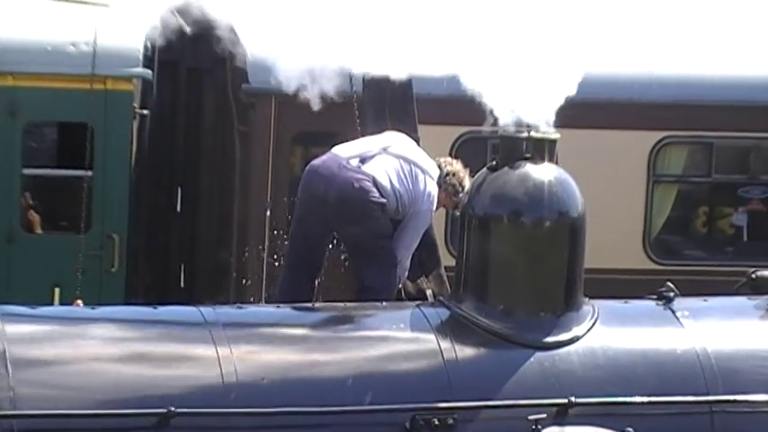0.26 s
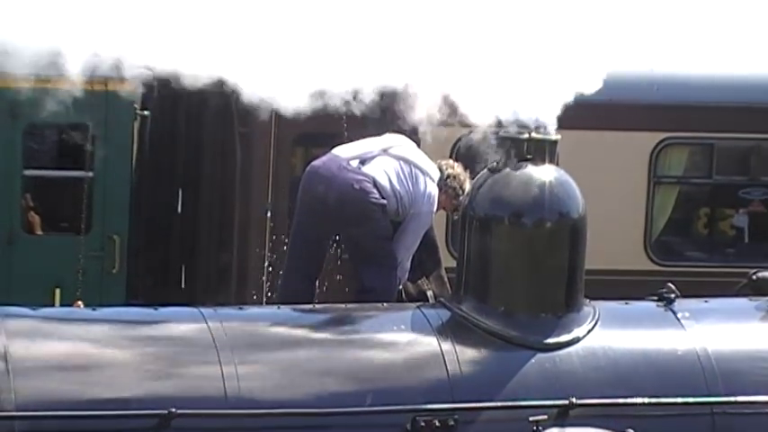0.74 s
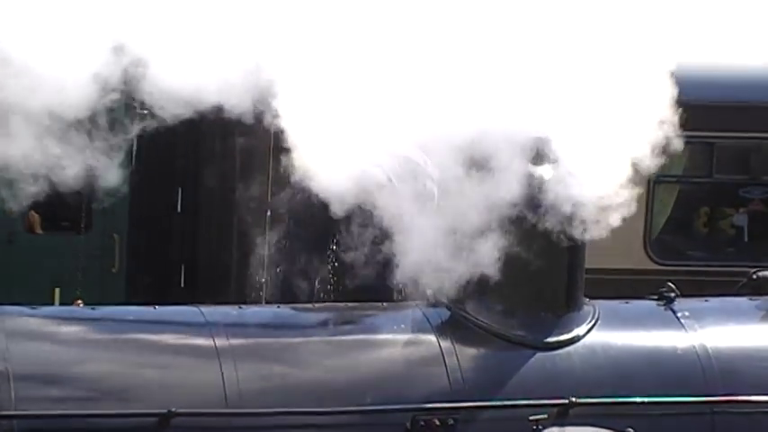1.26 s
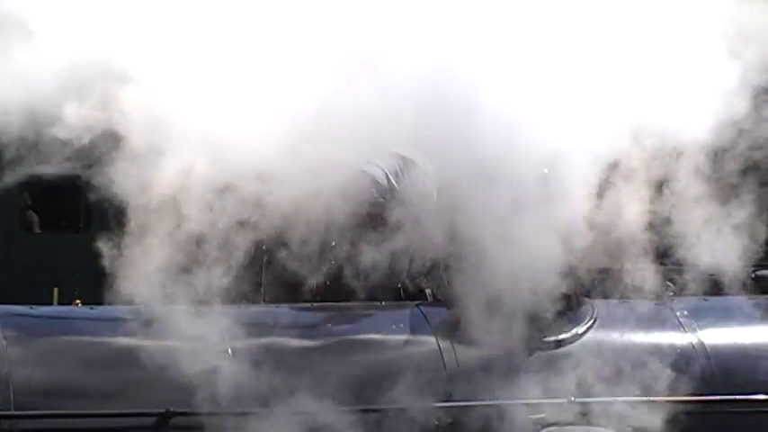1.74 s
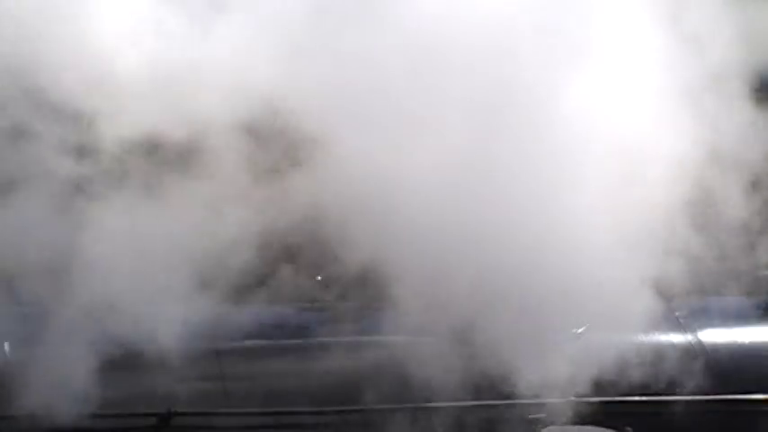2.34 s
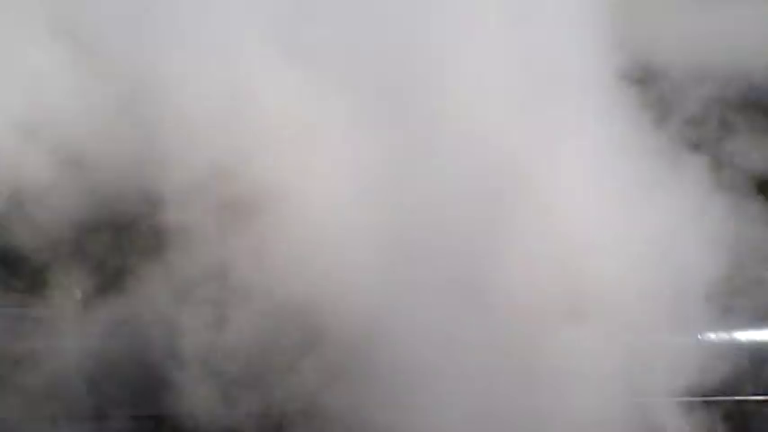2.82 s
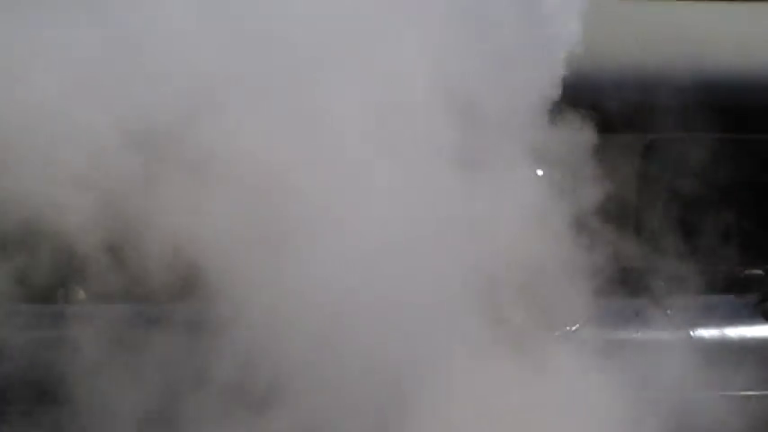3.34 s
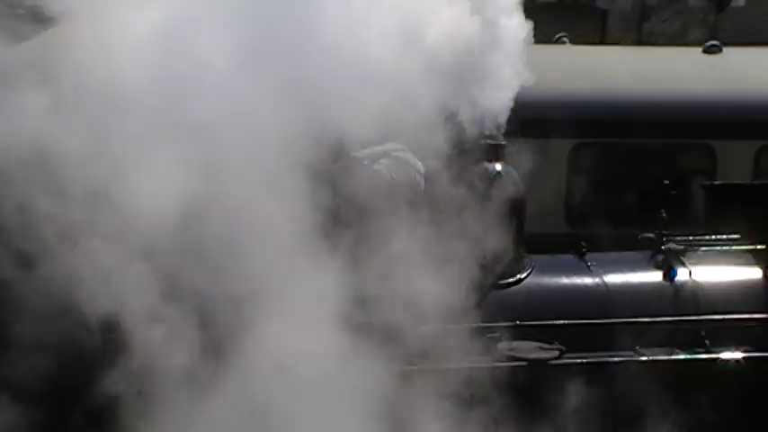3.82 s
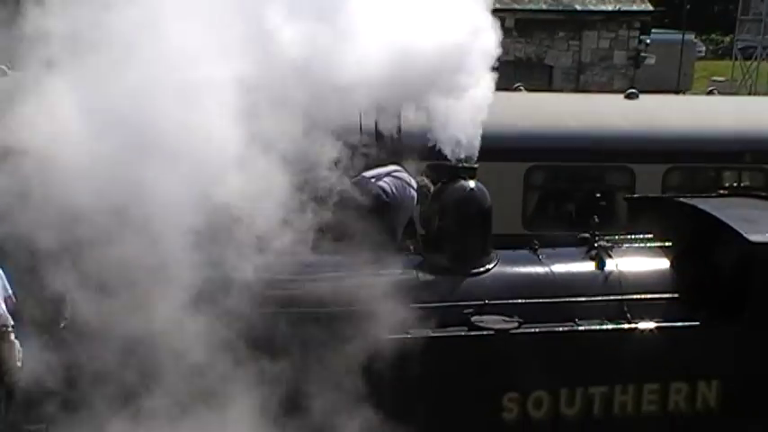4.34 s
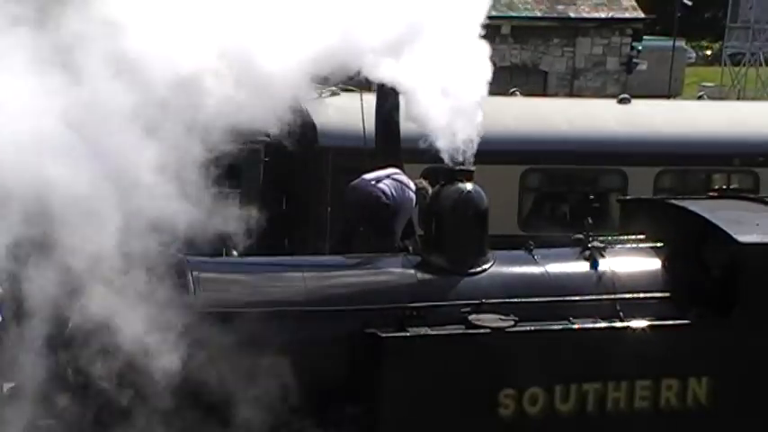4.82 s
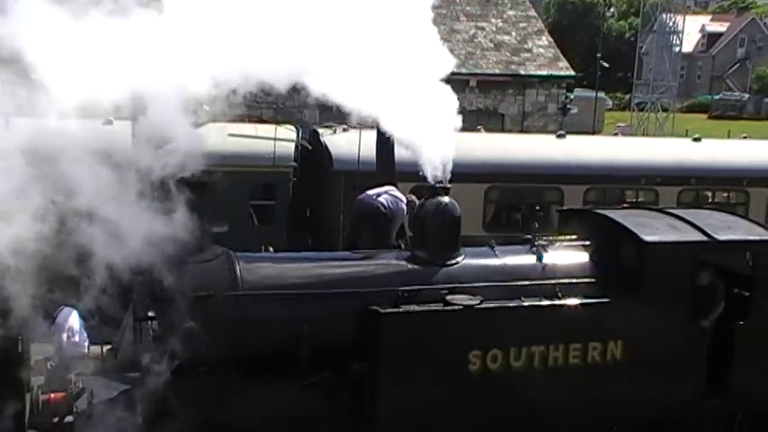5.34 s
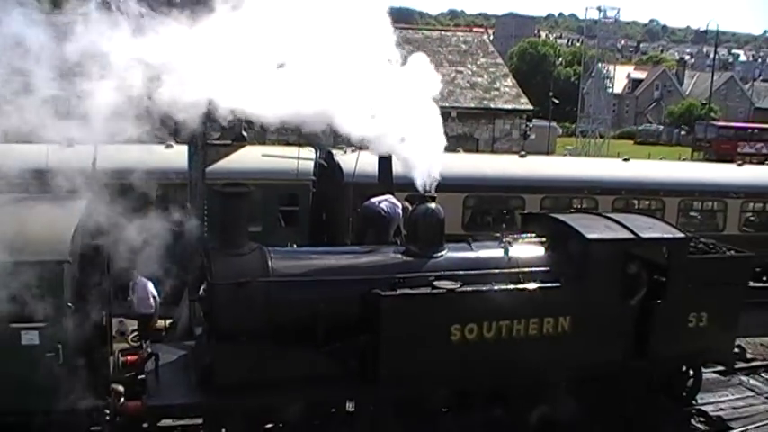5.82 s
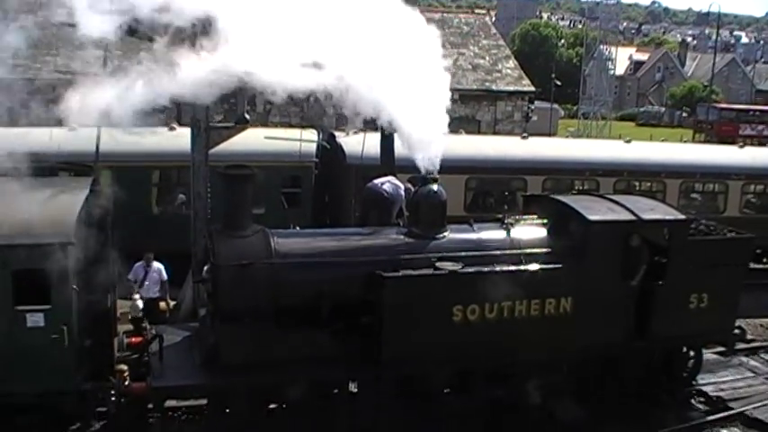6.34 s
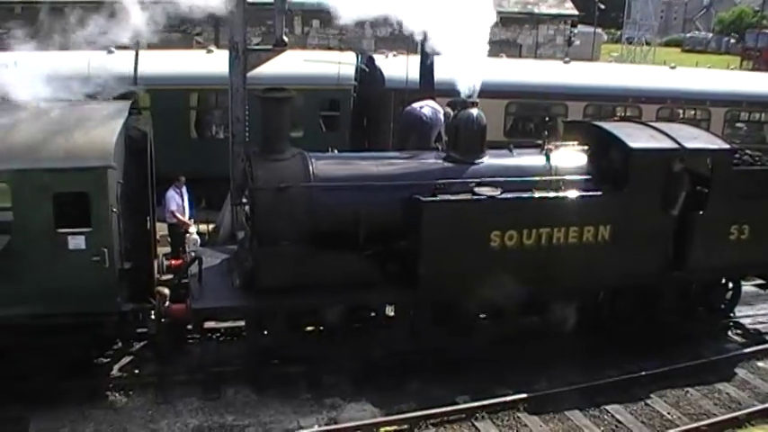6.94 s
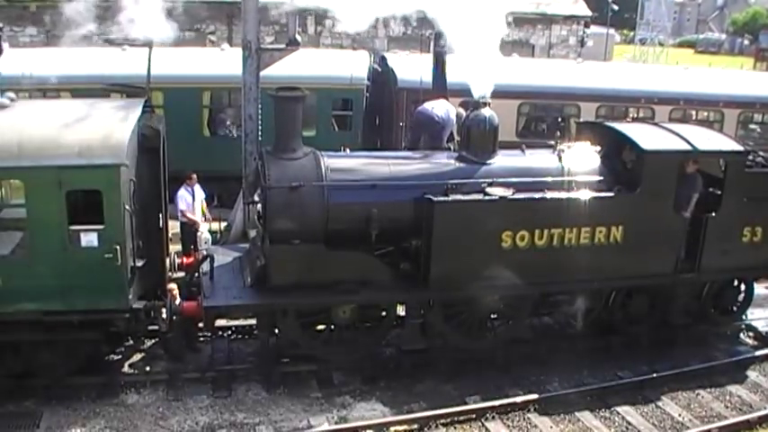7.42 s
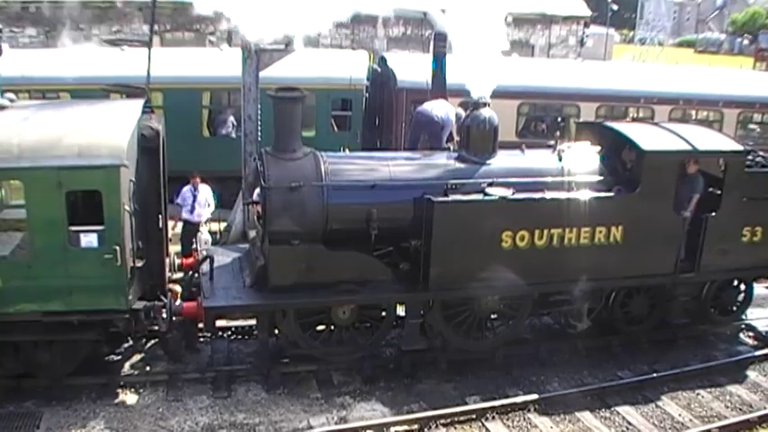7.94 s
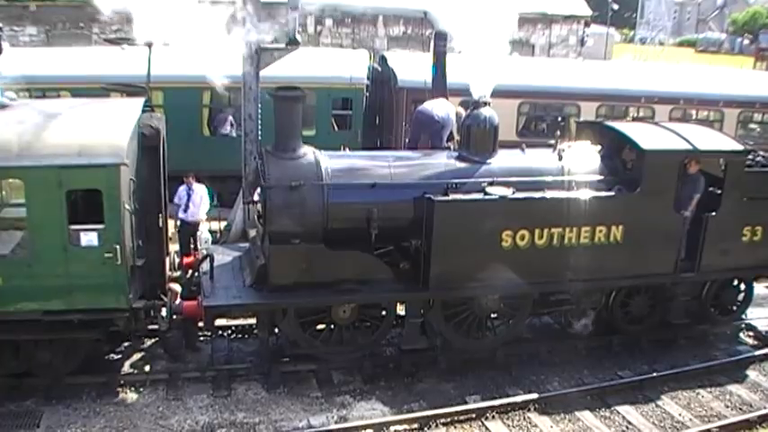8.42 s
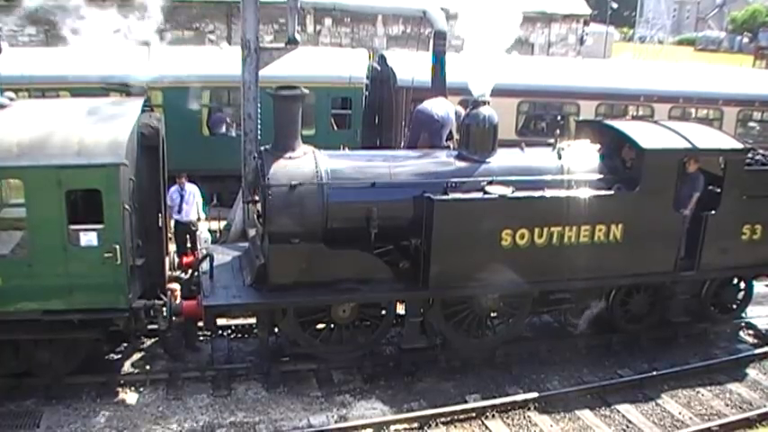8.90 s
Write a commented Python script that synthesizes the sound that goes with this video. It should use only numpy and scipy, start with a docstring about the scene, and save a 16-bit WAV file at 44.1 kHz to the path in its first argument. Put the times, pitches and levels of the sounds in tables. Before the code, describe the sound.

Full, constant steam noise fills the whole stretch, wide-band and rough, with a slightly hollow, resonant body and bright sizzling top. Near three seconds the highest hiss dulls a little, then clears. Low wind ruffles the two microphone channels early and more strongly near eight seconds. A barely audible low hum lies underneath. Open-air platform, little echo, no separate events.

```python
"""One unbroken jet of steam roars and hisses from the safety valves of a standing locomotive.
Shaped noise is the jet: resonances and close reflections colour it, a leaning, billowing plume sways it.
Carriages and platform add a faint scattered echo; gusts of low noise ruffle two microphone ports.
A low, slightly unsteady sine hums underneath."""
import sys
import numpy as np
from scipy import signal
from scipy.fft import rfft, irfft
from scipy.io import wavfile
from scipy.ndimage import uniform_filter1d

SR = 44100
rng = np.random.default_rng(int(sys.argv[2]) if len(sys.argv) > 2 else 0)


def bounce(signal):
    """Save signal as a 16-bit WAV file at the path given by the first command-line argument."""
    frames = np.transpose(np.atleast_2d(signal))
    limited = np.clip(frames, -1, 1)
    pcm = np.round(limited * 32767).astype(np.int16)
    wavfile.write(sys.argv[1], SR, pcm)


N = 404397
T_S = np.arange(N) / SR
FRAME_SIZE, HOP = 2048, 256  # samples
BIN_HZ = np.fft.rfftfreq(FRAME_SIZE, 1 / SR)
FRAME_S = np.arange(N // HOP + 2) * HOP / SR
BAND_EDGE_HZ = 15830


# jet spectrum, roar near 1 kHz and hiss near 7 kHz: f/Hz, relative density/dB
JET_SPECTRUM = [(40, -47), (130, -37), (220, -28), (310, -16.5), (440, -15), (720, -7.5), (1300, -0.5),
                (1900, -3.5), (3100, -3), (3900, -6.5), (5000, -7), (6300, -3), (7800, -1.5), (10800, -7.5),
                (11900, -14), (15600, -27)]
# likeness of the two ports: f/Hz, correlation
PORT_LIKENESS = [(100, .85), (300, 0.9), (600, 0.98), (3000, 0.98), (4300, .998), (5600, 0.94), (7500, 0.9),
                 (9000, 0.83), (10200, 0.48), (12500, 0.79), (15000, 0.85)]
# left minus right: f/Hz, level difference/dB
PORT_BALANCE = [(60, 12), (200, 5), (700, 4), (1200, 2), (2600, 1.8), (3600, 0), (5400, 0), (6800, 1.6),
                (8800, 1.3), (10100, 8), (11500, 3.5), (13300, 3.5), (14900, 3), (15600, 2)]
# phase by which left leads: f/Hz, phase/rad
PORT_LEAD = [(100, 0), (340, 0.39), (700, -0.32), (1300, 0.036), (4700, 0), (6600, -0.052), (7800, -0.13),
             (9400, 0.76), (9900, .8), (10900, -.4), (11800, .15), (15400, -.1)]


def safety_valves(jet_db=-15.5, flutter_db=1.08, patches_db=1.03):
    """Turbulent steam excites the resonances; eddies scatter short waves the most."""
    colour_db = over_hz(JET_SPECTRUM) + path_colour()
    flutter = flutter_db * eddies(seconds=.03, span_hz=5200)
    patches = patches_db * eddies(seconds=.092, span_hz=600)
    scatter = BIN_HZ / (BIN_HZ + 1000)
    jet_gain = gain_of(colour_db + plume_sway() + scatter * (flutter + patches))
    # each port takes half the level and phase difference, in opposite senses
    left = gain_of(over_hz(PORT_BALANCE) / 2) * np.exp(.5j * over_hz(PORT_LEAD))
    ports = np.array([left, 1 / left])[:, None]
    jet = sound_of(port_pair(over_hz(PORT_LIKENESS)) * jet_gain * ports)
    steam = casing(jet)
    return gain_of(jet_db) * steam / np.std(steam.mean(0))


# resonances and dips of casing, dome and surroundings, before scaling: f/Hz, width/Hz, lift/dB
CASING_RESONANCES = [(289, 20, 6.5), (382, 22, 6), (497, 58, 12), (578, 70, 8.8), (699, 52, 7),
                     (808, 135, 8.3), (1030, 40, -4), (1118, 20, 4.5), (1228, 75, 3.5), (1351, 28, 3),
                     (1927, 73, -3.2), (2155, 100, 4.6), (3020, 283, 2.2), (3512, 137, 3.2),
                     (4324, 362, 2.2), (5382, 224, -2.8)]


def casing(steam, ring=.98):
    """The steam sets narrow, fixed resonances ringing."""
    lift_db = ring * humps(CASING_RESONANCES, np.fft.rfftfreq(N, 1 / SR))
    return irfft(rfft(steam) * gain_of(lift_db), N)


# plume leaning toward the microphone (+) or away (-): t/s, lean
PLUME_LEAN = [(0, -0.47), (.4, -0.36), (.85, -1.3), (1.8, -.1), (2.5, -0.033), (3.2, 0.76), (4.3, .3),
              (5.7, -0.59), (6.7, 0.41), (7.7, -.35), (8.4, 0.65), (9.17, 0.19)]
# more roar and less hiss when leaning in: f/Hz, level per unit lean/dB
LEAN_SPECTRUM = [(300, 1), (800, 1.5), (1300, 1), (2200, 0.4), (4000, 0.6), (6500, -1), (9000, -1.9),
                 (11000, 1.2)]
# billows lifting or shading one band: t/s, length/s, f/Hz, level/dB
PLUME_BILLOWS = [(.37, 0.3, 850, 3), (.55, .22, 9500, 2.5), (.84, 0.087, 12000, 2), (.99, 0.16, 12500, -4),
                 (1.165, 0.1, 7500, 3), (1.454, .07, 1400, 4.5), (1.54, .09, 7000, 1.2),
                 (1.68, 0.13, 9000, -2), (1.808, 0.21, 895, 4.5), (2.036, 0.2, 11400, 3),
                 (2.163, 0.09, 10000, -2), (2.274, .06, 8000, 1.5), (2.496, 0.067, 7500, -5),
                 (2.61, 0.1, 5000, 4.5), (2.802, 0.03, 10000, 8), (3.184, 0.054, 2000, 3.5),
                 (5.676, 0.043, 11000, 1), (6.07, 0.11, 9400, -4.5), (7.426, .1, 10000, -2.3),
                 (8.12, 0.076, 8000, 3.5), (8.42, 0.11, 1200, 2), (8.93, 0.057, 9000, -1)]


def plume_sway(hiss_sway_db=.5, roar_sway_db=.32, billow_octaves=1.5):
    """Slow lean, large billows and restless random sway of the plume, as dB swings of the jet."""
    sway_db = curve(PLUME_LEAN, FRAME_S)[:, None] * over_hz(LEAN_SPECTRUM)
    octave = np.log2(BIN_HZ + 1)
    for s, length_s, hz, db in PLUME_BILLOWS:
        in_time = bell(FRAME_S[:, None], s, length_s)
        in_pitch = bell(octave, np.log2(hz), billow_octaves)
        sway_db = sway_db + db * in_time * in_pitch
    treble = BIN_HZ / (BIN_HZ + 3000)
    hiss_sway = hiss_sway_db * treble * eddies(seconds=.16, span_hz=9000)
    roar_sway = roar_sway_db * eddies(seconds=.12, span_hz=3100)
    return sway_db + hiss_sway + roar_sway


# close reflections for each microphone aim, before depth scaling: f/Hz, width/Hz, lift/dB
DOME_REFLECTIONS = [(1200, 210, -3), (1940, 150, -4.5), (2610, 230, -8), (3720, 400, -4), (5000, 900, -2.5),
                    (10700, 1400, -2.5)]
BOILER_REFLECTIONS = [(3336, 124, -1.5), (3940, 240, -2.2), (5340, 700, -6.5), (11000, 770, 2),
                      (11950, 650, -4.2)]
ENGINE_REFLECTIONS = [(554, 70, -6.5), (1960, 150, -3), (2660, 230, -3.2), (3090, 160, 3), (3333, 123, -5),
                      (3835, 280, -4.2), (5000, 850, -6), (11610, 615, -4)]
# steam cloud dulling the top: t/s, length/s, level at 15 kHz/dB
STEAM_CLOUD = (2.9, 1.3, -6)


def path_colour(haze_db=-.4, steepness=2.6, depth=.98):
    """Close reflections cancel or lift bands for each aim; haze and drifting cloud dull the top."""
    hollows = aimed(-1, 2.13) * humps(DOME_REFLECTIONS)
    hollows = hollows + aimed(3.66, 7.1) * humps(BOILER_REFLECTIONS)
    hollows = hollows + aimed(7.34, 11) * humps(ENGINE_REFLECTIONS)
    s, length_s, cloud_db = STEAM_CLOUD
    dulling_db = haze_db + cloud_db * bell(FRAME_S[:, None], s, length_s)
    top = np.minimum(BIN_HZ, BAND_EDGE_HZ) / 15000
    return depth * hollows + dulling_db * top ** steepness


def aimed(start_s, end_s, turn_s=1):
    """Share of one microphone aim, fading in and out as it turns."""
    inside_s = np.minimum(FRAME_S - start_s, end_s - FRAME_S)
    return np.clip(.5 + inside_s / turn_s, 0, 1)[:, None]


def station(x, echo_db=-13, t60_s=.17, dull_hz=3500, taps_per_s=1000, first_s=.008):
    """Carriages and platform return scattered, dulled echoes, which ripple the spectrum finely."""
    t = np.arange(SR // 4) / SR
    signs = rng.choice([-1., 1.], len(t))
    present = (rng.random(len(t)) < taps_per_s / SR) * (t > first_s)
    taps = signs * present * gain_of(-60 * t / t60_s)
    taps = taps / np.linalg.norm(taps)
    echoes = signal.lfilter(*signal.butter(1, dull_hz, fs=SR), taps)
    return x + gain_of(echo_db) * signal.oaconvolve(x, echoes[None], axes=1)[:, :N]


# gusts, before the wind trim: t/s, length/s, level/dB
WIND_GUSTS = [(.55, 0.18, -44), (.95, .16, -50), (1.64, .12, -55), (2.54, .14, -47), (3.077, 0.073, -42),
              (7.65, 0.2, -36.5), (7.844, 0.1, -35), (8.04, 0.22, -41), (8.44, 0.28, -39.5),
              (9.05, 0.31, -61)]
# light air between gusts, before the wind trim: t/s, level/dB
WIND_BREEZE = [(0, -68), (1, -67), (2.7, -59), (3.7, -77), (6, -74), (7.1, -61), (8.3, -54), (9.17, -63)]
# wind noise spectrum: f/Hz, relative level/dB
WIND_SPECTRUM = [(20, -30), (60, -14), (110, -7.5), (150, 1.5), (230, 0.5), (330, -8), (450, -8),
                 (1000, -36), (3000, -80)]


def wind(trim_db=.5, lumps_db=3, likeness=-.92, side_db=1.2):
    """Lumpy gusts rise out of the breeze and push the two ports mostly in opposite senses."""
    lumps = gain_of(lumps_db * eddies(seconds=.035, span_hz=200))
    spectra = port_pair(likeness) * gain_of(over_hz(WIND_SPECTRUM)) * lumps
    buffet = evened(sound_of(spectra))
    force = gain_of(curve(WIND_BREEZE, T_S))
    for s, length_s, db in WIND_GUSTS:
        force = force + gain_of(db) * bell(T_S, s, length_s)
    return buffet * force * gain_of(trim_db + np.array([[side_db], [-side_db]]))


# hum swelling and sinking: t/s, rms level/dB
HUM_LEVEL = [(0, -74), (1.5, -67.5), (3, -66.5), (4.5, -68.5), (5.8, -84), (6.6, -68), (9.17, -69)]


def hum(pitch_hz=113.1, waver_rms_hz=.54):
    """A faint sine whose pitch wavers at random and whose level swells and sinks."""
    drift = np.interp(T_S, FRAME_S, eddies(seconds=.26, span_hz=20)[:, 0])
    phase = 2 * np.pi * np.cumsum(pitch_hz + waver_rms_hz * drift) / SR
    return gain_of(curve(HUM_LEVEL, T_S)) * evened(np.sin(phase))


def eddies(seconds, span_hz):
    """Random patches in time and frequency, rms 1."""
    field = rng.standard_normal((len(FRAME_S), len(BIN_HZ)))
    frames = max(round(seconds * SR / HOP), 1)
    bins = max(round(span_hz * FRAME_SIZE / SR), 1)
    field = uniform_filter1d(field, frames, axis=0, mode="wrap")
    return evened(uniform_filter1d(field, bins, axis=1, mode="wrap"))


def port_pair(likeness):
    """Spectra of two noises with the given correlation."""
    c, left = np.clip(likeness, -1, 1), noise()
    return np.array([left, c * left + np.sqrt(1 - c ** 2) * noise()])


def noise():
    """Short-time spectra of white noise."""
    white = rng.standard_normal((len(FRAME_S) - 1) * HOP)
    return signal.stft(white, nperseg=FRAME_SIZE, noverlap=FRAME_SIZE - HOP)[2].T


def sound_of(spectra):
    """Waveforms from short-time spectra."""
    _, x = signal.istft(spectra.swapaxes(1, 2), nperseg=FRAME_SIZE, noverlap=FRAME_SIZE - HOP)
    return x[:, :N]


def humps(rows, at_hz=BIN_HZ):
    """Summed dB lift of resonances; width at half the dB height."""
    return sum(db / (1 + (2 * (at_hz - hz) / width_hz) ** 2) for hz, width_hz, db in rows)


def bell(x, centre, width, edge=1.7):
    """Smooth bump of height 1, width at half height."""
    return .5 ** (np.abs(2 * (x - centre) / width) ** edge)


def over_hz(points):
    """Spectrum joined by straight lines on a log-frequency axis."""
    f, value = np.transpose(points)
    return np.interp(np.log(BIN_HZ + 1), np.log(f + 1), value)


def curve(rows, at_s):
    """Time curve joined by straight lines."""
    return np.interp(at_s, *np.transpose(rows))


def gain_of(db):
    """Amplitude ratio of a dB level."""
    return 10 ** (np.asarray(db) / 20)


def evened(x):
    """Scale to rms 1."""
    return x / np.sqrt(np.mean(x ** 2) + 1e-20)


def scene():
    """Steam with its station echo, wind and hum."""
    return station(safety_valves()) + wind() + hum()


def record(dry, ceiling=.92):
    """Clip peaks at the ceiling, then low-pass at the band edge."""
    held = np.clip(dry, -ceiling, ceiling)
    low_pass = signal.firwin(1023, BAND_EDGE_HZ, window=("kaiser", 9), fs=SR)
    return signal.oaconvolve(held, low_pass[None], "same")


dry = scene()
out = record(dry)
bounce(out)
```